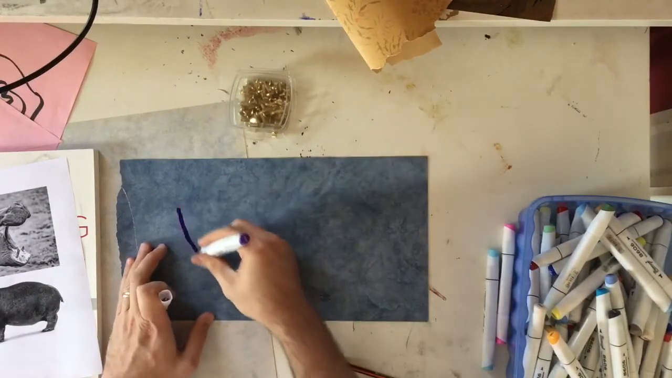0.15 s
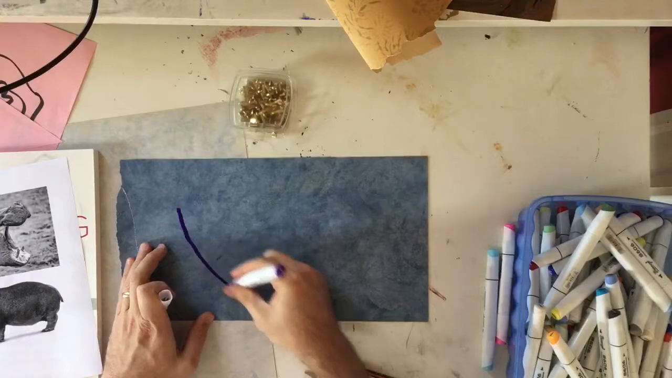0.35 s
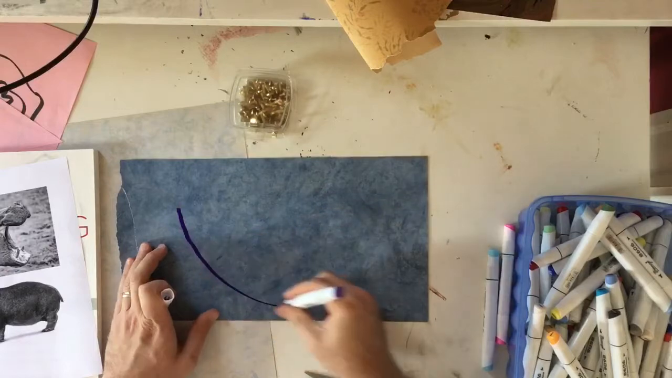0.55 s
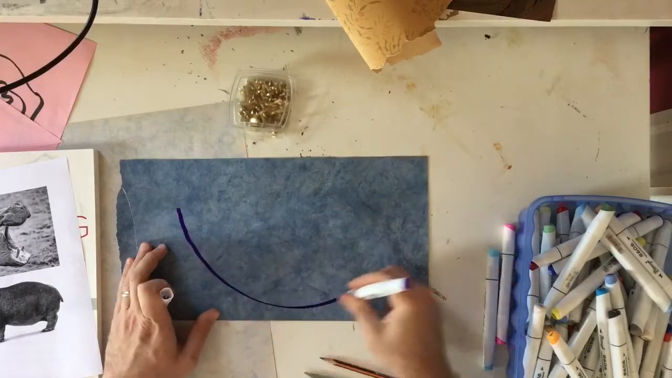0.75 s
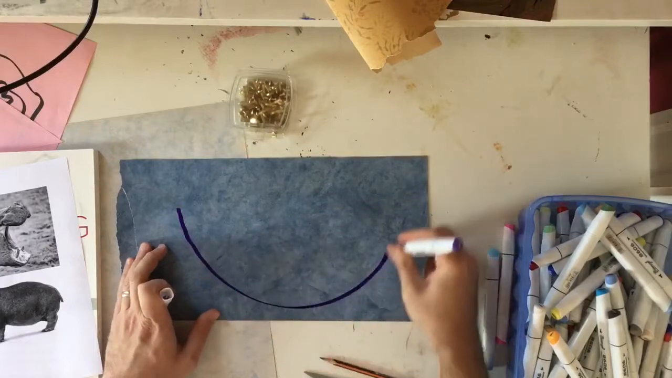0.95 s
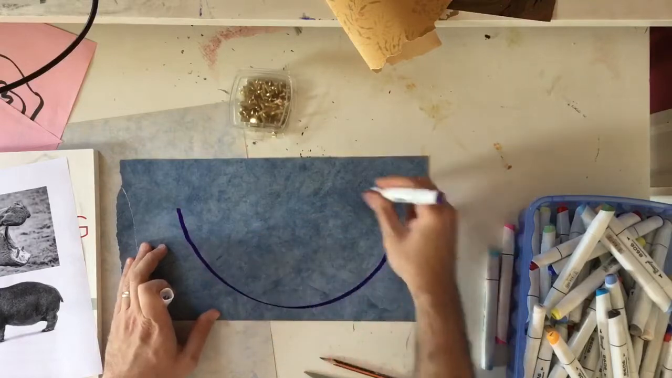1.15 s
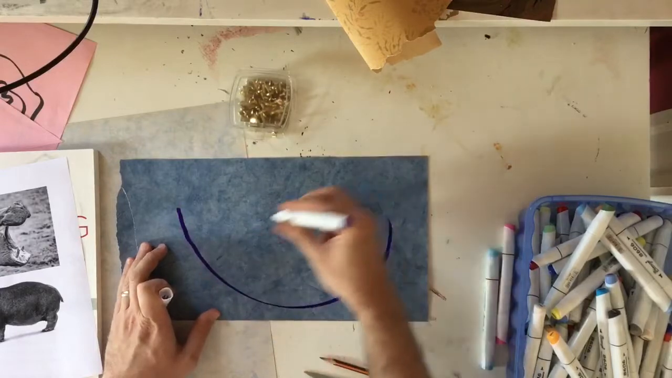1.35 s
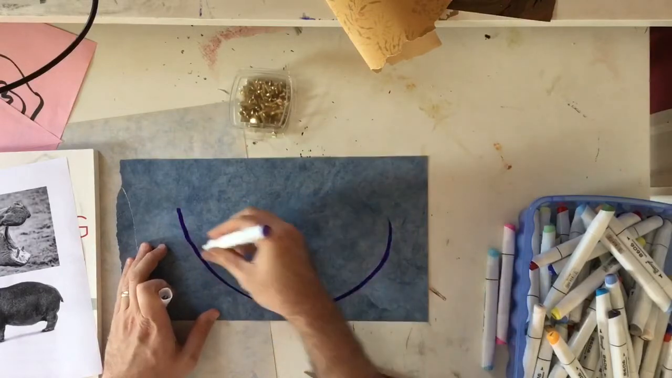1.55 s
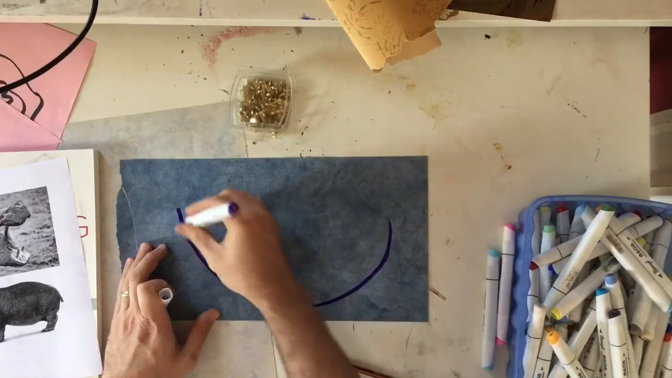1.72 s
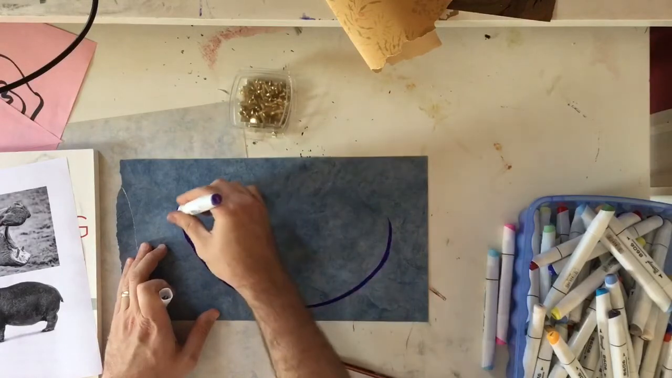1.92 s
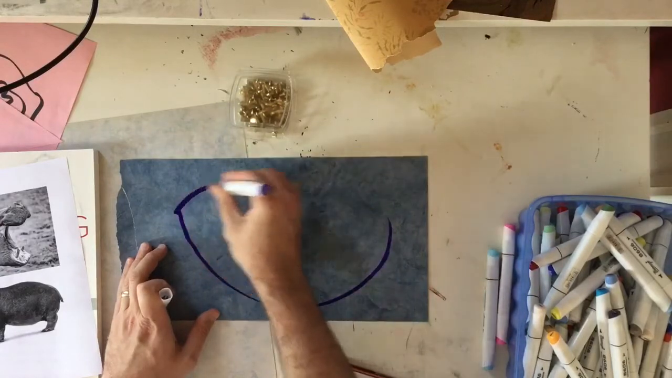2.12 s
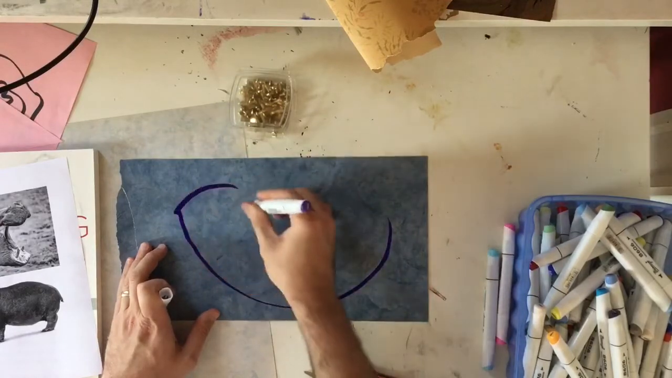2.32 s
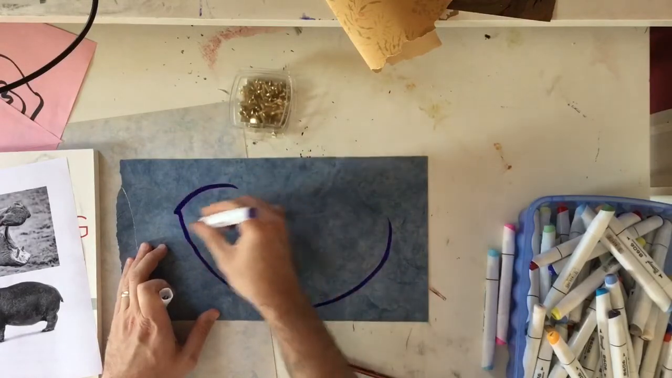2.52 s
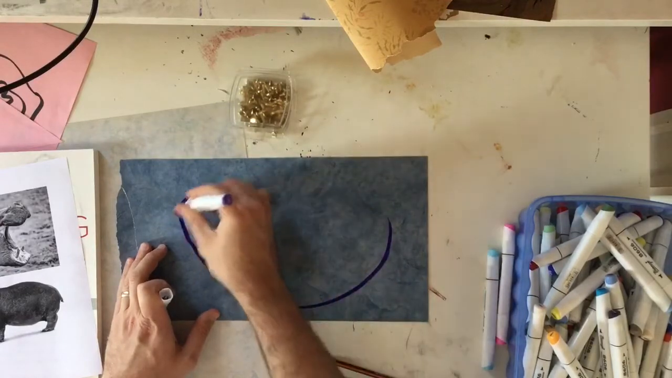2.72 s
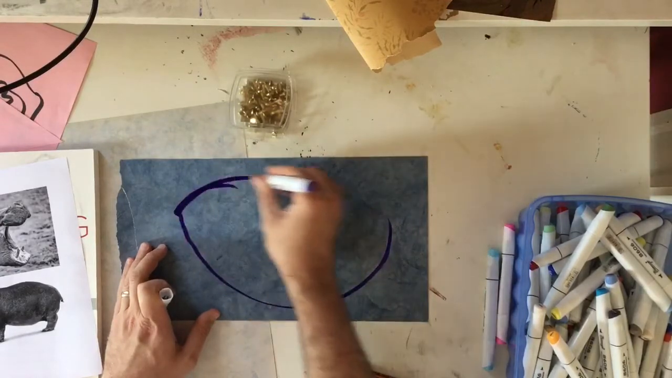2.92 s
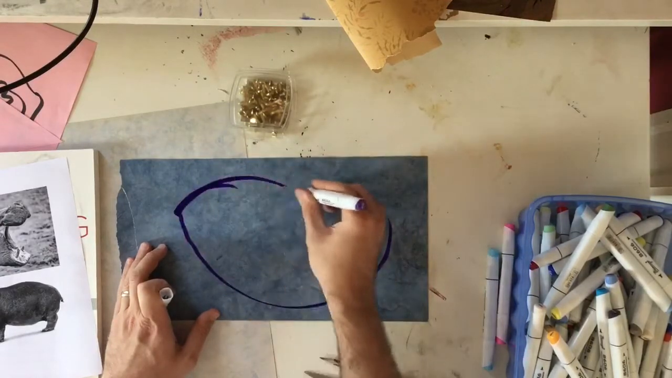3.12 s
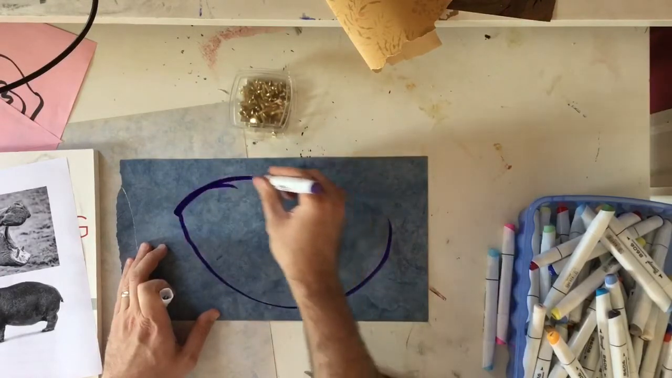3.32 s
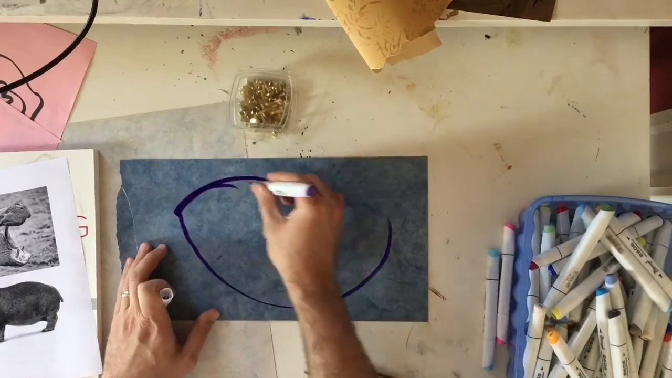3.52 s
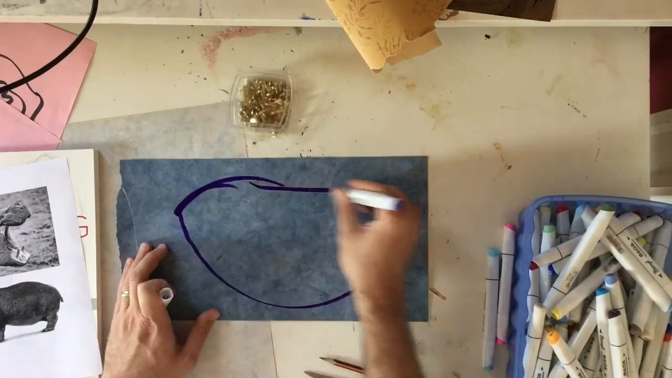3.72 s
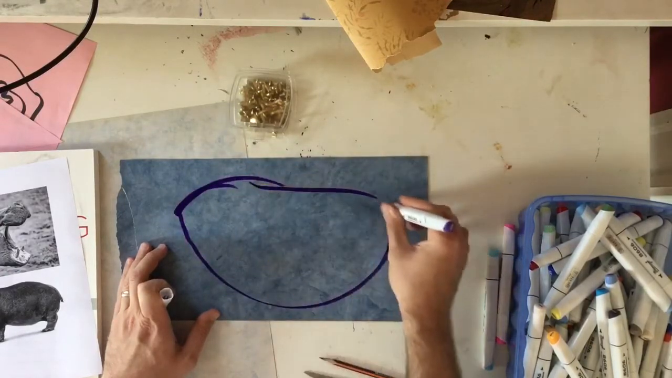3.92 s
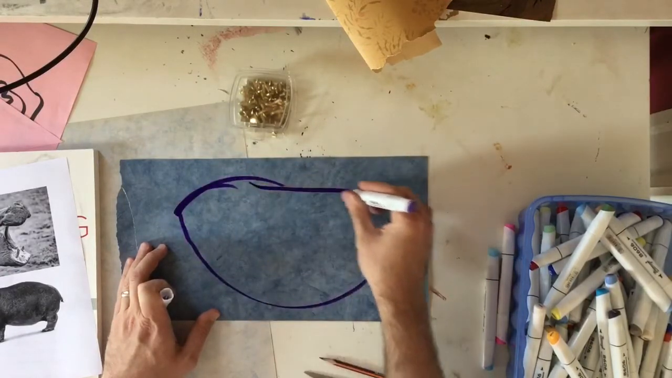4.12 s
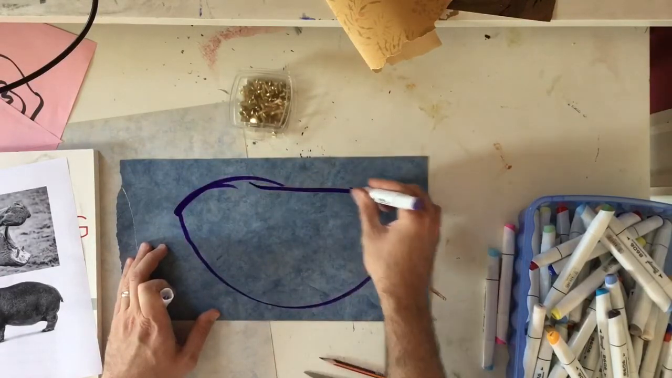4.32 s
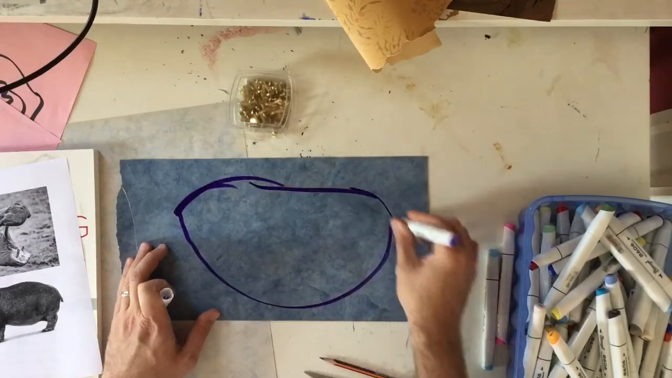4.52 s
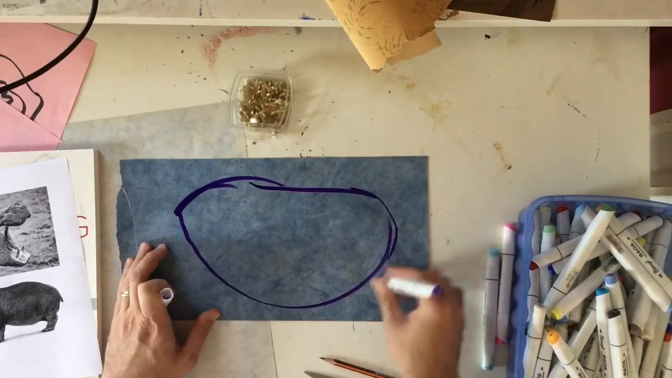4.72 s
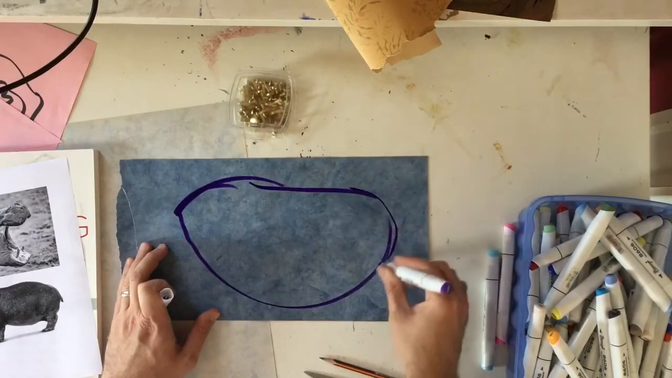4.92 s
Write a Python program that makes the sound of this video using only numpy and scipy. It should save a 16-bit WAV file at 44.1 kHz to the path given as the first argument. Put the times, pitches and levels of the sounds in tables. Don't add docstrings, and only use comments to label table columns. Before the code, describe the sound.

A felt-tip marker scratches five dry strokes across heavy paper on a wooden table, with soft landing thumps and one sharp knock.

```python
import sys
import numpy as np
from scipy import signal
from scipy.fft import rfft, irfft, next_fast_len
from scipy.io import wavfile
from scipy.ndimage import uniform_filter1d, map_coordinates

SR = 44100
rng = np.random.default_rng(int(sys.argv[2]) if len(sys.argv) > 2 else 0)


def transcribe(signal):
    frames = np.atleast_2d(signal).T
    limited = np.clip(frames, -1, 1)
    pcm = np.round(limited * 32767).astype(np.int16)
    wavfile.write(sys.argv[1], SR, pcm)


def ratio_of_db(decibels):
    return 10 ** (np.asarray(decibels, float) / 20)


N = 222998


# time in seconds, drag level in dB, pressure in dB.
NIB_STROKES = [
    [(0, -60, 5), (.1, -63.5, 2), (.24, -59, 2), (.46, -58.5, -0.5), (.66, -60.5, -2.5), (.92, -59.5, -3),
     (1.0, -62, -8.5)],
    [(1.91, -69, 2), (1.97, -60.5, -1), (2.06, -58, 0), (2.15, -64, -8.5), (2.21, -69, -5), (2.25, -69, -2)],
    [(2.665, -64, -4), (2.73, -60.5, -3), (2.82, -58.5, -5.5), (2.92, -61, -9), (3.02, -71.5, -9.5)],
    [(3.475, -66.5, -4), (3.54, -62, -5), (3.62, -61.5, -9.5), (3.69, -58.5, -14.5), (3.78, -62.5, -7)],
    [(4.295, -68.5, -14), (4.36, -64, -6), (4.5, -63.5, -12.5), (4.61, -61, -7.5)],
]


def strokes():
    t = np.arange(N) / SR
    s, _, pressure_db = np.transpose(sum(NIB_STROKES, []))
    drags = []
    for rows in NIB_STROKES:
        at, db, _ = np.transpose(rows)
        touch = plateau(at[0], at[-1] - at[0], 0, rise_db_per_s=750, fall_db_per_s=352)
        drags.append(np.interp(t, at, db) + touch)
    return np.max(drags, axis=0), np.interp(t, s, pressure_db)


# frequency in Hz, level in dB per Hz.
PAPER_COLOUR = [(240, -17), (400, 1), (459, -8.5), (694, -4), (761, -3.5), (1280, -6.5), (1490, -6),
                (2030, -8.5), (3120, -11), (3860, -14.5), (6500, -13.5), (11300, -20), (15600, -26)]
# frequency in Hz, width in Hz, level in dB.
BOARD_RESONANCES = [(765, 77, -9), (1017, 22, -2.5), (1530, 44, -1), (2280, 52, -8), (2206, 38, 16)]
# frequency in Hz, width in Hz, level in dB.
NIB_RESONANCES = [(3440, 350, -13.5), (4250, 370, -3.5), (5650, 710, -5), (6490, 140, -0.5)]
# frequency in Hz, width in Hz, level in dB.
FIBRE_RESONANCES = [(9200, 190, 6), (11060, 550, 6), (13100, 1200, -36)]


def marker():
    nib_db, table_db = strokes()
    sheet_db = 0.51 * table_db
    fizz_db = -6 - 0.42 * table_db

    def scrape(peaks, share, lo_hz, hi_hz, patchy_db, spiky_db):
        def colour(f):
            body = 1 + share * np.abs(resonances(peaks, f))
            return ratio_of_db(along(PAPER_COLOUR, f)) * body * band(f, lo_hz, hi_hz)
        return grain(colour, patchy_db, spiky_db)

    table = scrape(BOARD_RESONANCES, 0.41, 356, 1070, patchy_db=2.15, spiky_db=1.5)
    sheet = scrape(BOARD_RESONANCES, 0.24, 1190, 1850, patchy_db=3.3, spiky_db=-0.6)
    nib = scrape(NIB_RESONANCES, 1.0, 2210, 7140, patchy_db=3.5, spiky_db=0.7)
    fizz = scrape(FIBRE_RESONANCES, 0.37, 6600, 18000, patchy_db=4.0, spiky_db=1.2)
    friction = ratio_of_db(nib_db + 0.6 * wobble(14))
    return friction * (nib + ratio_of_db(table_db) * table + ratio_of_db(sheet_db) * sheet + ratio_of_db(fizz_db) * fizz)


# middle in seconds, length in seconds, pitch in Hz, level in dB.
SQUEAK_TONES = [(1.03, .1, 1100, -70), (2.03, .16, 1750, -64), (2.02, .14, 1250, -66),
                (2.8, .16, 1500, -66), (3.61, .18, 1490, -66), (3.69, .16, 2290, -70),
                (4.36, .18, 11850, -72), (4.53, .14, 9300, -75), (4.49, .12, 1900, -65),
                (4.49, .1, 1690, -68), (4.605, .09, 1900, -66), (4.59, .08, 12800, -71)]


def squeaks():
    t = np.arange(N) / SR
    out = np.zeros(N)
    for s, length, hz, db in SQUEAK_TONES:
        waver = unit(wobble(min(hz / 16, 330)))
        out += ratio_of_db(db) * swell(s, length) * waver * np.sin(2 * np.pi * hz * t)
    return out


# start in seconds, hold in seconds, level in dB, fade in dB per s.
HAND_BRUSHES = [
    (1.625, .035, -69, 250),
    (1.69, .07, -79, 150),
    (2.365, .03, -65, 300),
    (2.4, .035, -63, 900),
    (2.48, .075, -68.5, 200),
]
# frequency in Hz, level in dB per Hz.
SKIN_COLOUR = [(1470, -17), (2500, -17.5), (3070, -20), (3870, -15), (4240, -19), (4980, -10.5), (6070, -7),
               (7350, -15), (10900, -15), (15600, -28)]


def hand():
    def colour(f):
        return ratio_of_db(along(SKIN_COLOUR, f)) * (1 + 0.65 * np.abs(resonances([(5670, 740, 0)], f)))

    gain = sum(ratio_of_db(plateau(s, hold, db, 1300, fade)) for s, hold, db, fade in HAND_BRUSHES)
    return gain * grain(colour, patchy_db=3.0)


# time in seconds, peak in dB, upper modes in dB, contact in ms,
# free ringing in seconds.
NIB_LANDINGS = [
    (0.494, -46.5, -9, 1.26, 0.036),
    (1.891, -40.5, 2, 1.33, 0.068),
    (2.65, -40, 0, 1.53, 0.059),
    (2.887, -40.5, 5, 1.1, 0.042),
    (3.459, -39, 1, 1.67, 0.049),
    (4.284, -43, 3.5, 1.94, 0.042),
]
# frequency in Hz, level in dB, decay t60 in seconds.
LANDING_MODES = [(115.8, 4, 0.87), (171.5, -1.5, 0.12), (243.6, -4, 0.14), (305, -4, 0.17),
                 (384.6, -0.5, 0.11), (454, -31, 0.043)]


def landings():
    out = np.zeros(N)
    for s, db, upper_db, contact_ms, free in NIB_LANDINGS:
        modes = [(hz, level + upper_db * (hz > 200), t60) for hz, level, t60 in LANDING_MODES]
        sway = ringing([(66.1, 3, 1.0)], 1.13)
        ring = ringing(modes, 0.19) + sway
        t = np.arange(len(ring)) / SR
        damping_db = -18 / (1 + np.exp((free - t) / .005))
        out += signal.fftconvolve(push(s, db - 3, contact_ms), ring * ratio_of_db(damping_db))[:N]
    return out


# time in seconds, level in dB, contact in ms.
RAP_BLOWS = [
    (.777, -37, 0.16),
    (0.7816, -23, 2.13),
    (0.786, -39, 0.8),
    (.789, -28, 2.3),
    (.795, -35.5, 0.72),
]
# frequency in Hz, level in dB, decay t60 in seconds.
TABLE_MODES = [(119, 4.5, .23), (99, -6, .2), (167, -6.5, .36), (219, -7, .3), (306, -9, .3), (68, -4, .22),
               (255, -20, .2),
               (374, -20, 0.19), (531, -7, 0.18), (629, 4, 0.15), (696, -10, 0.2), (758, -9, 0.2),
             (994, -12, .15), (1276, -13, 0.17), (1437, -5, 0.1), (1497, -3, 0.14), (2130, -7, 0.09),
             (2280, -12, .1)]
# frequency in Hz, level in dB per Hz.
CLATTER_COLOUR = [(300, 6.5), (650, -5.5), (1000, -0.5), (1480, 4), (1850, -4.5), (2250, 1), (3000, -7),
                  (4500, -6.5), (6500, -22), (10000, -40)]
# frequency in Hz, t60 in seconds.
CLATTER_DECAY = [(500, 0.4), (1500, 0.15), (3000, 0.06), (7000, 0.043)]


def knuckle():
    force = sum(push(*blow) for blow in RAP_BLOWS)
    ring = signal.fftconvolve(force, ringing(TABLE_MODES, 0.14))[:N]
    clatter = np.zeros(N)
    burst = dying_noise(CLATTER_DECAY)
    clatter[round(RAP_BLOWS[0][0] * SR):][:len(burst)] = burst
    return ring + ratio_of_db(-4.5) * filtered(clatter, lambda f: ratio_of_db(along(CLATTER_COLOUR, f)))


# time in seconds, level in dB, top frequency in Hz.
PAPER_SNAPS = [
    (0.777, -42, 6800),
    (1.257, -60, 4530),
]


def snaps():
    total, t = np.zeros(N), np.arange(SR // 20) / SR
    for s, db, top_hz in PAPER_SNAPS:
        out = np.zeros(N)
        out[round(s * SR):][:len(t)] = ratio_of_db(db - 60 * t / 0.024) * rng.standard_normal(len(t))
        total += filtered(out, lambda f: band(f, 1800, top_hz))
    return total


# frequency in Hz, t60 in seconds.
ROOM_DECAY = [(200, 0.38), (2000, 0.24), (10000, 0.072)]


def walls(x):
    return signal.fftconvolve(np.pad(x, (300, 0)), dying_noise(ROOM_DECAY))[:N]


# middle in seconds, length in seconds, deep rumble in dB, creak in dB.
ARM_SHIFTS = [(.47, .14, -57, -68), (1.09, .07, -64, -74), (1.22, .08, -65, -74), (1.51, .07, -72, -67),
              (1.6, .08, -65, -80), (1.66, .1, -66, -71), (1.8, .06, -64, -75), (2.14, .1, -64, -68),
              (2.28, .1, -72, -68), (2.46, .12, -75, -70), (2.77, .12, -59, -61), (3.7, .14, -67, -64),
              (3.79, .07, -60, -68), (4.07, .08, -66, -74), (4.61, .11, -61, -65), (4.83, .1, -64, -74)]
# frequency in Hz, level in dB per Hz.
RUMBLE_COLOUR = [(15, -45), (25, -14.5), (75, 1.5), (103, -5), (227, -10), (277, -11.5), (343, -12.5),
                 (379, -16), (500, -35), (650, -57), (1100, -120)]


def arm_rumble():
    drag_db, pressure_db = strokes()
    drag = ratio_of_db(drag_db + .5 * pressure_db)

    def rumble(rest_db, drag_share_db, shift_column, lo_hz, hi_hz, patchy_db):
        gain = ratio_of_db(rest_db + 3 * wobble(18)) + ratio_of_db(drag_share_db) * drag
        gain += sum(ratio_of_db(row[shift_column]) * swell(row[0], row[1]) for row in ARM_SHIFTS)
        return gain * grain(lambda f: ratio_of_db(along(RUMBLE_COLOUR, f)) * band(f, lo_hz, hi_hz), patchy_db)

    deep = rumble(-65.5, -12, 2, 1, 165, patchy_db=.7)
    creak = rumble(-71, -10, 3, 165, 2000, patchy_db=1.1)
    return deep + creak


# frequency in Hz, level in dB per Hz.
HISS_COLOUR = [(180, -34.5), (300, 3.5), (342, -12.5), (391, -9), (476, -7.5), (836, -10.5), (1070, -13.5),
               (1880, -16.5), (1970, -18), (11900, -29.5), (15600, -41)]


def microphone_hiss():
    return ratio_of_db(-71) * grain(lambda f: ratio_of_db(along(HISS_COLOUR, f)) * band(f, 300, 20000), patchy_db=1.76)


def grain(colour, patchy_db, spiky_db=0):
    unevenness = np.resize(wobble(700), N + 2048)
    catches = rng.standard_normal(N + 2048) * ratio_of_db(spiky_db * unevenness)
    z = signal.stft(catches, nperseg=1024)[2]
    field = uniform_filter1d(rng.standard_normal(z.shape), 2, 0)
    field = uniform_filter1d(field, 7, 1)
    patches = ratio_of_db(patchy_db * np.clip(unit(field), -3, 2))
    noise = signal.istft(z * patches, nperseg=1024)[1][:N]
    return unit(filtered(noise, colour))


def push(s, db, contact_ms):
    force = np.zeros(N)
    shape = np.hanning(int(contact_ms * SR / 500) + 3)
    force[round(s * SR):][:len(shape)] = ratio_of_db(db) * shape / shape.sum()
    return force


def ringing(modes, cycles):
    t = np.arange(SR * 3 // 4) / SR
    out = np.zeros(len(t))
    for k, (hz, db, t60) in enumerate(modes):
        envelope = ratio_of_db(db - 60 * t / t60) * (1 - np.exp(-t * hz / cycles))
        out += (-1) ** k * envelope * np.sin(2 * np.pi * hz * t)
    return out


def dying_noise(t60s):
    hz, t, z = signal.stft(rng.standard_normal(SR // 2), SR, nperseg=128)
    tail = signal.istft(z * ratio_of_db(-60 * t / along(t60s, hz)[:, None]), SR, nperseg=128)[1]
    return tail / np.linalg.norm(tail)


def resonances(peaks, f):
    total = 0
    for k, (c, w, db) in enumerate(peaks):
        total = total + (-1) ** k * ratio_of_db(db) * 1j * f * w / (c * c - f * f + 1j * f * w)
    return total


def plateau(start, hold, db, rise_db_per_s, fall_db_per_s):
    t = np.arange(N) / SR
    return db - rise_db_per_s * np.maximum(start - t, 0) - fall_db_per_s * np.maximum(t - start - hold, 0)


def swell(middle, length):
    return np.cos(np.pi * np.clip((np.arange(N) / SR - middle) / length, -.5, .5)) ** 2


def wobble(rate):
    return map_coordinates(rng.standard_normal(int(N * rate / SR) + 4), [np.arange(N) * rate / SR])


def unit(x):
    return x / np.sqrt(np.mean(x ** 2) + 1e-20)


def along(points, hz):
    f, v = np.transpose(points)
    return np.interp(np.log(hz + 1), np.log(f + 1), v)


def band(f, lo_hz, hi_hz):
    return 1 / np.sqrt((1 + (lo_hz / (f + 1)) ** 8) * (1 + (f / hi_hz) ** 8))


def filtered(x, response):
    m = next_fast_len(N + SR // 2)
    return irfft(rfft(x, m) * response(np.fft.rfftfreq(m, 1 / SR)), m)[..., :N]


def scene():
    rub = marker() + squeaks() + hand()
    hits = landings() + knuckle() + snaps()
    room = walls(ratio_of_db(-12.0) * rub + ratio_of_db(-10.5) * hits)
    return (rub + hits + room + arm_rumble() + microphone_hiss())[None]


def roll_off(x):
    return signal.sosfilt(signal.butter(12, 15710, fs=SR, output="sos"), x)


def record(dry):
    thin = filtered(dry, lambda f: (1j * f / (32 + 1j * f)) ** 5)
    return roll_off(thin)


dry = scene()
out = record(dry)
transcribe(out)
```